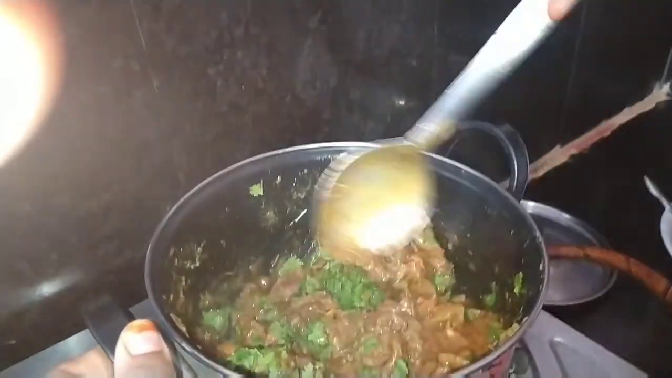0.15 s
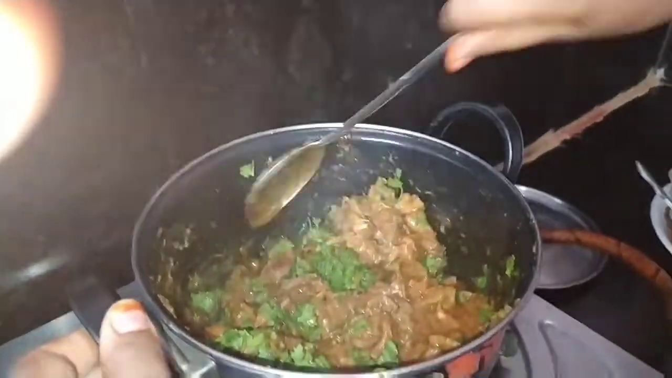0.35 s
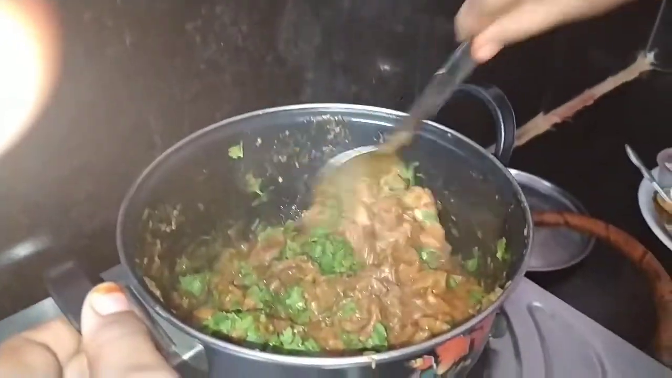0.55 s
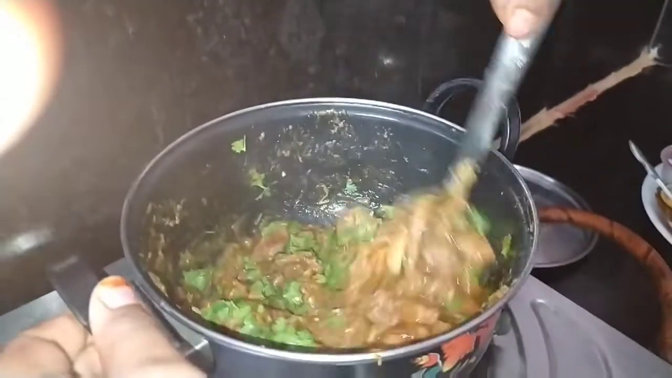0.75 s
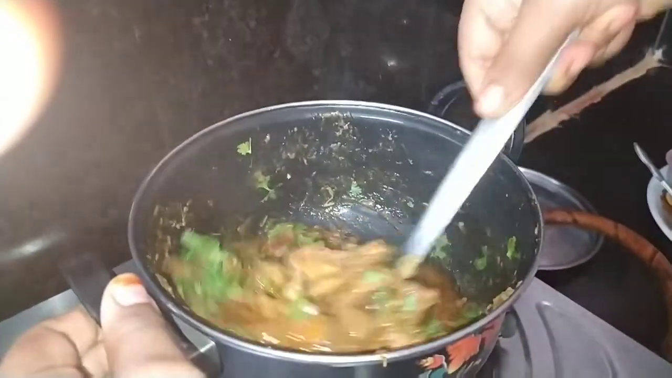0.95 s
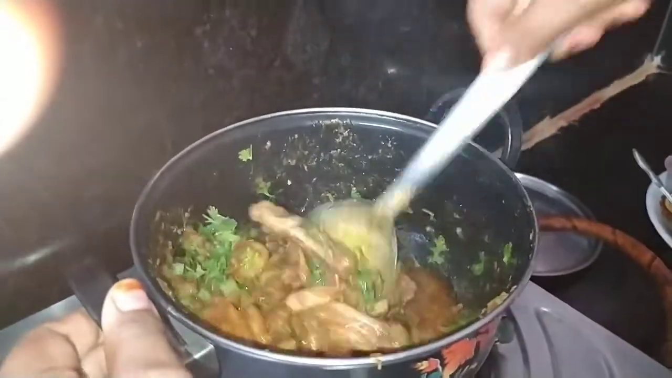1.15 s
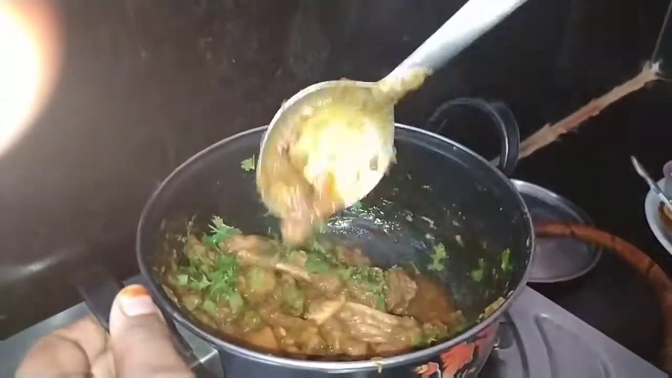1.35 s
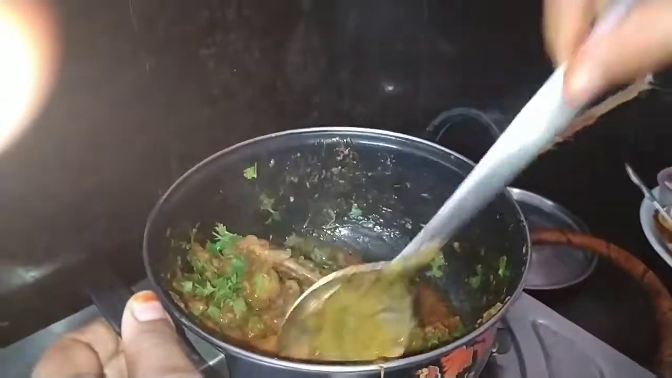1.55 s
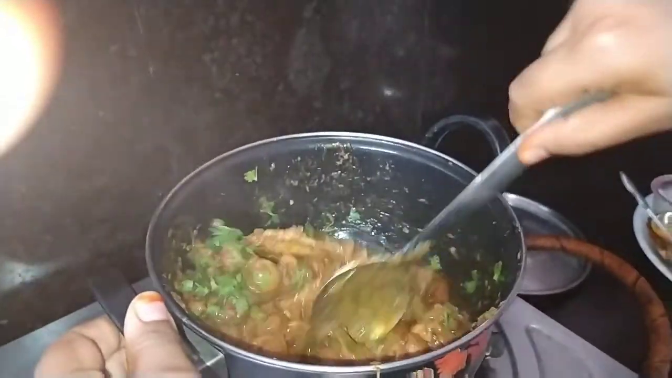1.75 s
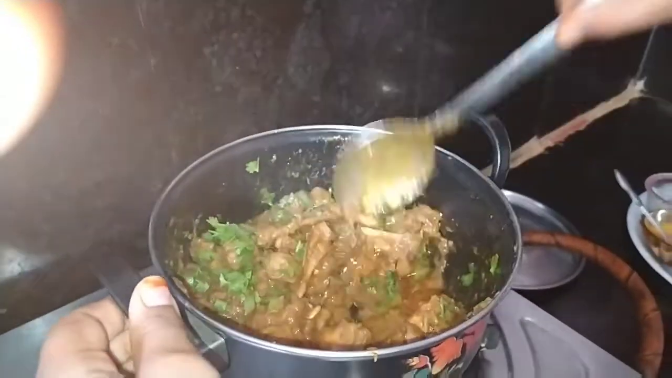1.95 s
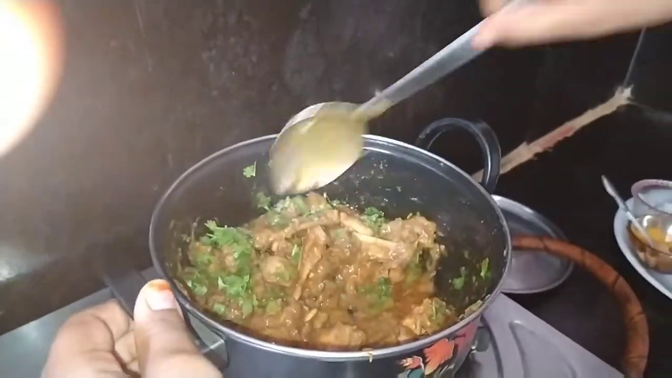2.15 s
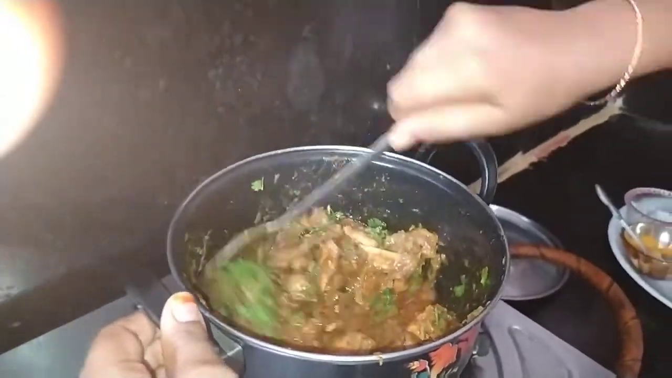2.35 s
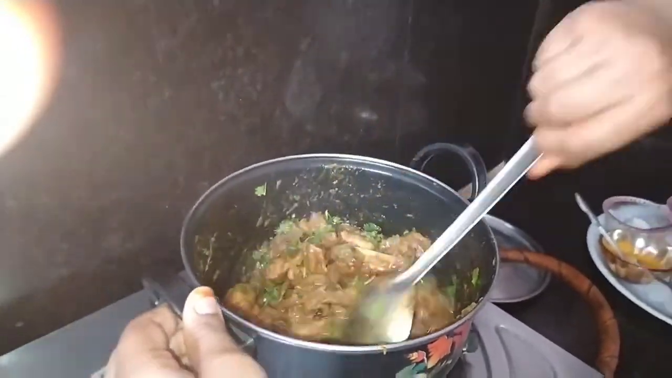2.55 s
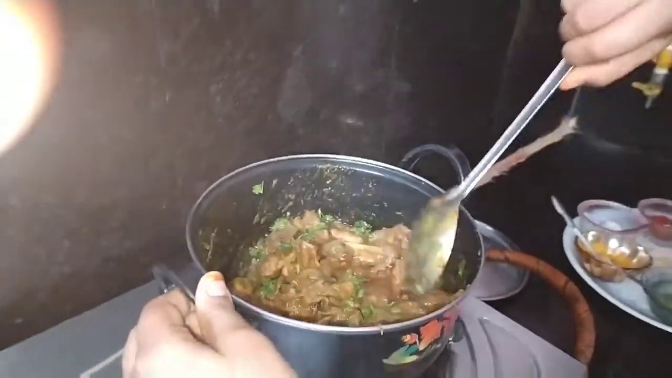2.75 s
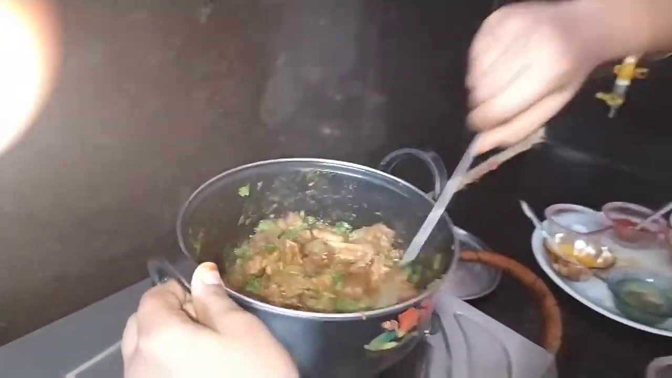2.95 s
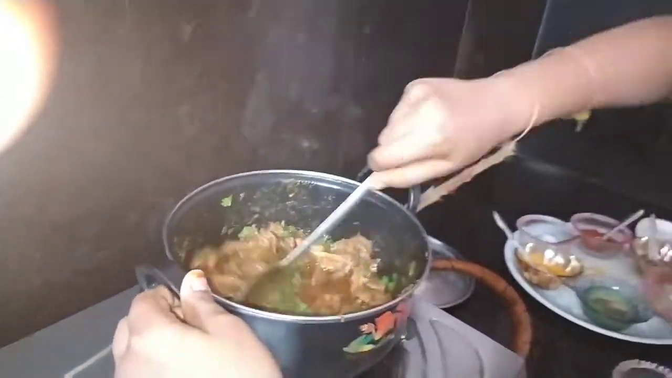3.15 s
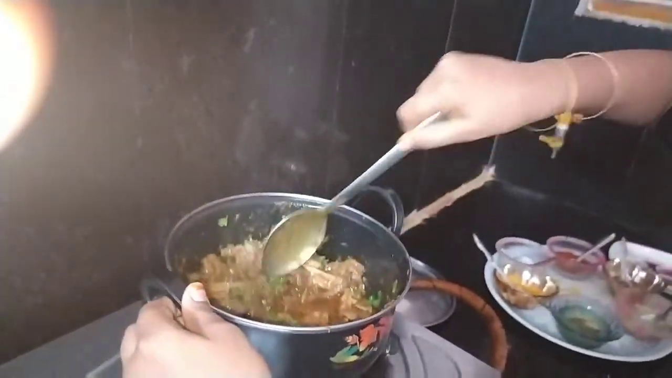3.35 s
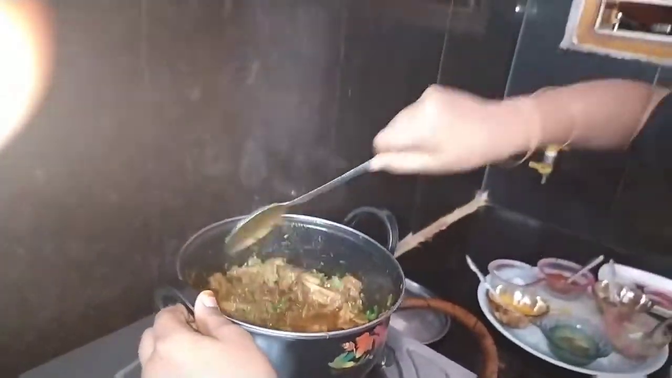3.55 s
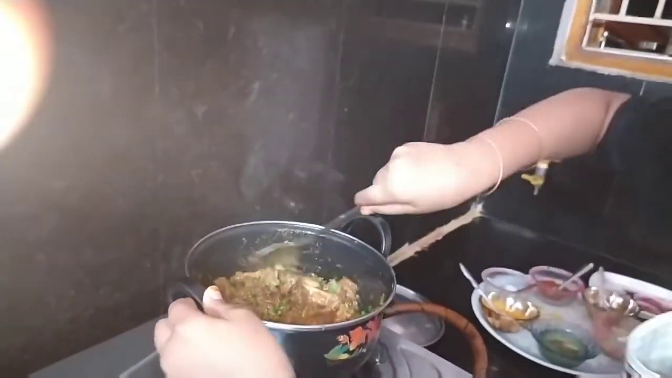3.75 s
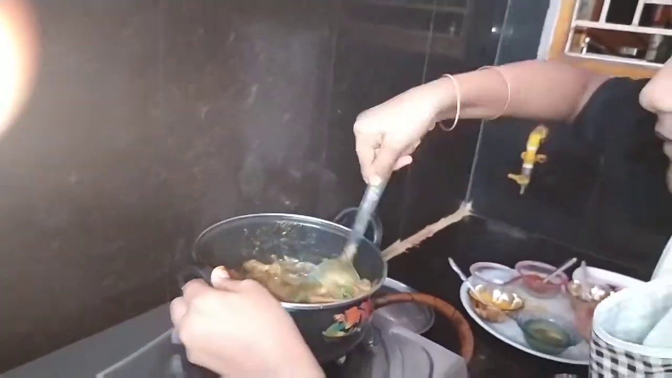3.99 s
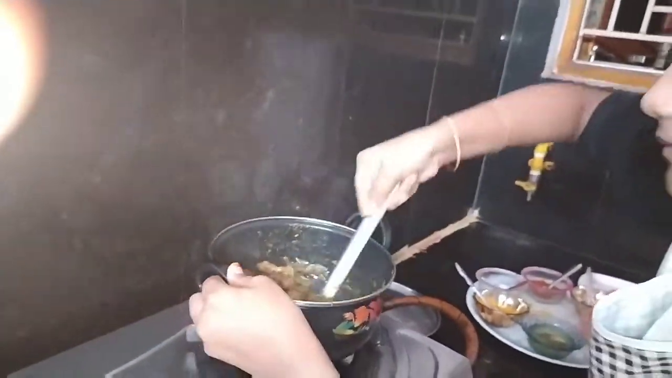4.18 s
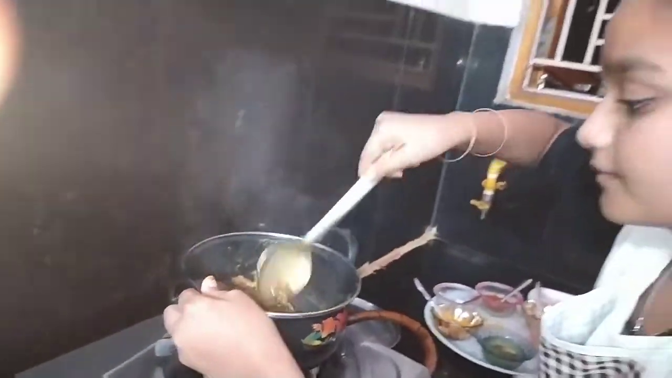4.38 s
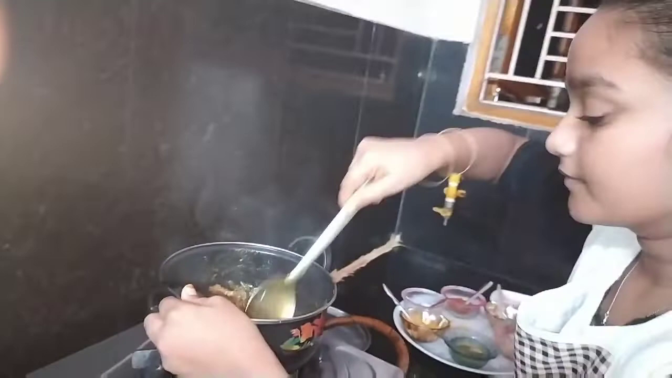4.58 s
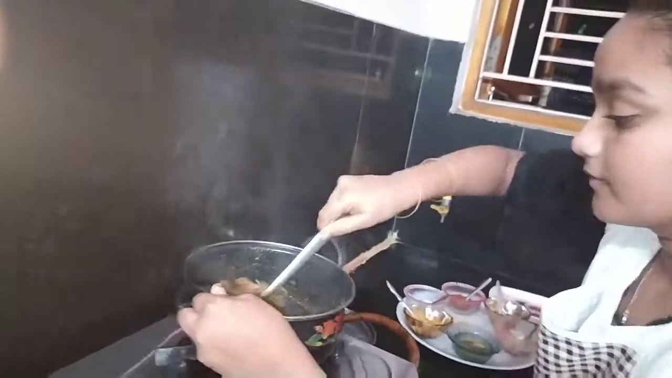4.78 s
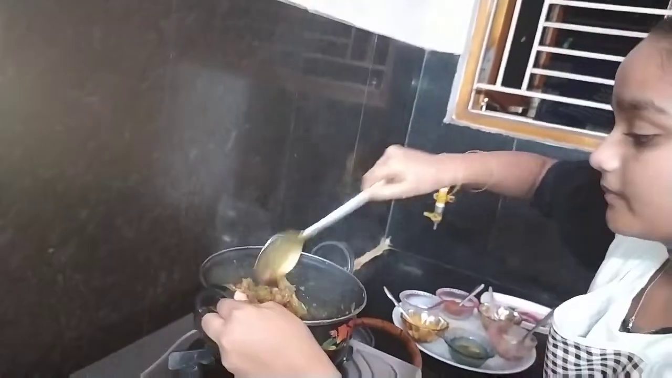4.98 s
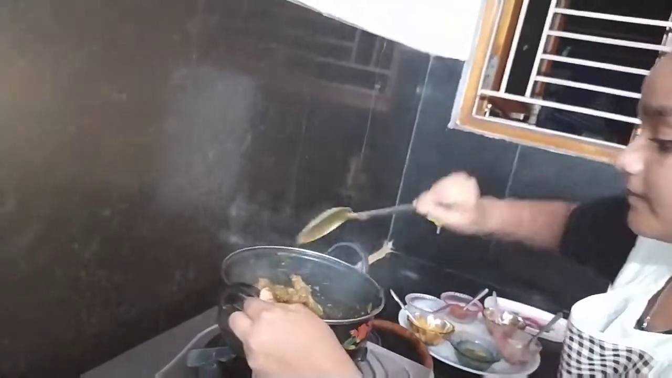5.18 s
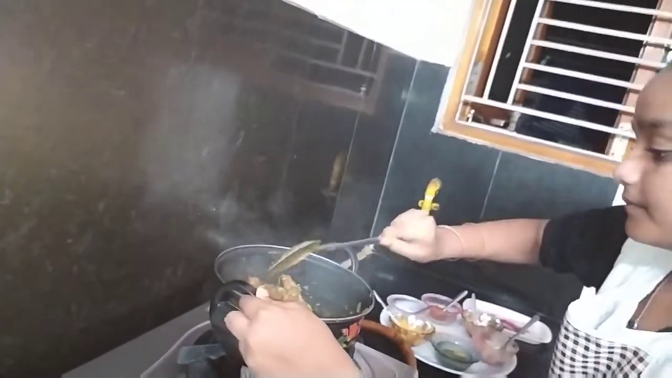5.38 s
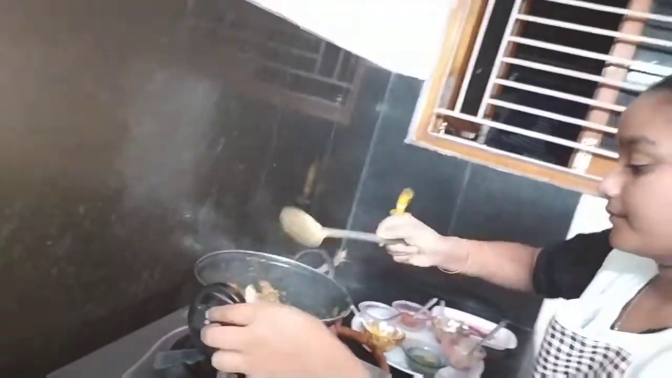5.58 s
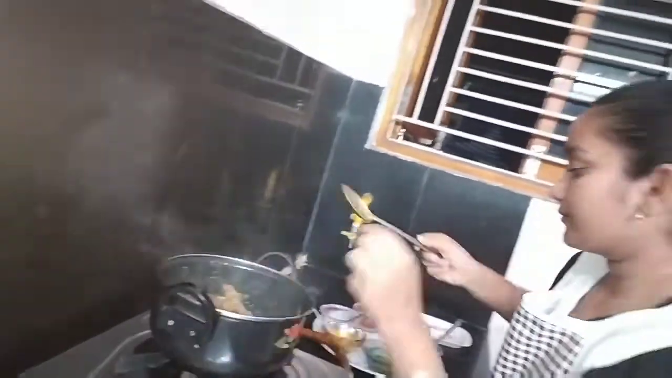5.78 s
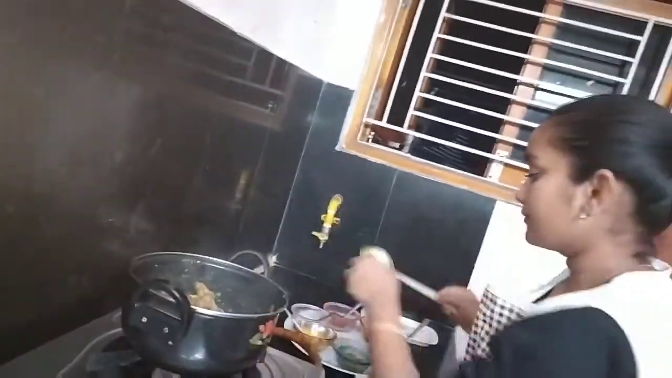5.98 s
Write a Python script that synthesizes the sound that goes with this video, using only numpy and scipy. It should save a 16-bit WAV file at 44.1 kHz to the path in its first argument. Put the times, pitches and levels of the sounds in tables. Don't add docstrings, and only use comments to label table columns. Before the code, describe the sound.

Quiet hiss and a low motor hum run throughout in a small hard-tiled kitchen, heard closely in stereo. Faint wet ticks begin at 0.2 s; from 0.4 s a steel ladle rubs the metal pan, knocking at 0.64 and more brightly at 0.85 amid gritty scrapes. A deep falling plop at 1.07 is followed by drips and small high blips until 1.35. A double clank lands at 1.8 with a low pan boom, then the hardest, brightest clank at 2.2, trailed by scraping to 2.7, strongest near 2.6. Another clank at 2.95 leads into short scrapes until 3.25, then faint drips. A knock at 3.66 starts softer continuous rubbing, with tiny fuzzy squeaks between 3.9 and 4.2. A sharp ringing clank comes at 4.74, then near quiet, a duller booming knock at 5.7 and a faint plop at 5.95.

```python
import sys
import numpy as np
from scipy import signal
from scipy.io import wavfile
from scipy.ndimage import uniform_filter1d

SR = 44100
rng = np.random.default_rng(int(sys.argv[2]) if len(sys.argv) > 2 else 0)


def elevation(decibels):
    levels = np.asarray(decibels, float)
    return 10 ** (levels / 20)


def int16_out(signal):
    q = np.round(np.clip(np.atleast_2d(signal).T, -1, 1) * 32767)
    wavfile.write(sys.argv[1], SR, q.astype(np.int16))


N = 265669


def evened(x):
    return x / np.sqrt(np.mean(x ** 2) + 1e-20)


def read(points, hz):
    point_hz, value = np.transpose(points)
    return np.interp(np.log(hz + 1), np.log(point_hz + 1), value)


def add(mix, s, sound):
    part = mix[..., round(s * SR):][..., :sound.shape[-1]]
    part += sound[..., :part.shape[-1]]


def resonate(x, hz, width_hz):
    turn = np.exp(2j * np.pi * np.cumsum(hz * np.ones(x.shape[-1])) / SR)
    r = np.exp(-np.pi * width_hz / SR)
    return 2 * (turn * signal.lfilter([1 - r], [1, -r], x / turn)).real


def resonate_twice(x, hz, width_hz):
    return resonate(resonate(x, hz, width_hz), hz, width_hz)


def sides(pan_db):
    return elevation(np.array([pan_db / 2, -pan_db / 2]))


def causal(db):
    log_gain = np.log(elevation(np.maximum(np.r_[db, db[-2:0:-1]], -100)))
    taps = np.fft.ifft(np.exp(log_gain - 1j * signal.hilbert(log_gain).imag)).real[:2048]
    return taps / np.linalg.norm(taps)


def wander(x, patchy_db):
    z = signal.stft(x, nperseg=512, noverlap=384)[2]
    patches = uniform_filter1d(rng.standard_normal(z.shape), size=2, axis=1)
    patches = uniform_filter1d(patches, size=16, axis=2)
    z = z * elevation(patchy_db * evened(patches) - 1.5)
    return signal.istft(z, nperseg=512, noverlap=384)[1][:, :N]


# hz, level_db_per_hz
STEEL_CLOUD = [(120, -31.5), (200, -5), (419, -13.5), (664, 7.5), (2860, 9), (5650, -2.5), (9840, -3.5),
               (15300, -16), (16500, -58)]


def body(modes, lo_hz, hi_hz):
    hz = np.fft.rfftfreq(8192, 1 / SR) + 1
    lifts_db = sum(db / (1 + (2 * (hz - f) / w) ** 2) for f, w, db in modes)
    band_db = -10 * np.log10((1 + (lo_hz / hz) ** 6) * (1 + (hz / hi_hz) ** 6))
    return causal(read(STEEL_CLOUD, hz) + lifts_db + band_db)


# mode_hz, width_hz, lift_db
EDGE_MODES = [(4950, 140, 1), (6900, 2700, 0.5), (8970, 300, 4.5), (9735, 510, 4.5), (12400, 2500, 3)]
WALL_MODES = [(1600, 220, 1.5), (2030, 580, 3), (2730, 560, 3.5), (3350, 230, -6), (3860, 2000, 5.5)]
BOWL_MODES = [(258.6, 73, 14), (305, 38, 15), (498, 47, 13.5), (690, 25, 4)]


def parts():
    return body(EDGE_MODES, 5830, 22000), body(WALL_MODES, 1170, 4130), body(BOWL_MODES, 159.8, 620)


# start_s, edge_peak_db, wall_db, contact_ms, room_db
KNOCK_EVENTS = [(.6425, -16, -37, 17, -6.5), (0.851, -13, -31, 4.6, -12), (1.794, -15.5, -35, 2.9, -8.5),
                (1.8255, -10.5, -27.5, 2.8, -9), (2.213, -6.5, -17, 3.2, -4.5), (2.951, -9, -21, 5.3, -6.5),
                (3.015, -22, -32, 5.3, 2), (3.1, -27, -45, 11, -8), (3.661, -19.5, -42, 4, -6.5),
                (3.673, -28, -44.5, 2.7, -7), (4.7385, -8, -23.5, 4.2, -2.5), (5.71, -32.5, -43.5, 10.2, 0),
                (5.726, -18, -33.5, 2.3, -6.5)]


def knocks(ring_db=-8.0, ring_s=0.0063):
    out, to_room = np.zeros((2, N)), np.zeros((2, N))
    edge, wall, _ = parts()
    t = np.arange(3000) / SR
    for s, edge_db, wall_db, ms, room_db in KNOCK_EVENTS:
        pan = sides(1.1 + 0.49 * edge_db)[:, None]
        contact = np.exp(-(t * 1000 / max(ms, .3)) ** 6)
        shape = np.maximum(contact, elevation(ring_db) * np.exp(-t / ring_s))
        shape *= np.minimum(t * 1000 / (.3 + 0.18 * ms), 1)
        near, far = rng.standard_normal((2, 3000))
        rough = shape * np.array([0.24 * near + 0.9 * far, near])
        click = elevation(edge_db - 6.5) * edge + elevation(wall_db + 4.5) * wall
        add(out, s, pan * signal.oaconvolve(rough, click[None], axes=1))
        add(to_room, s, pan * elevation(room_db) * np.linalg.norm(shape) * click)
    return out, to_room


def drag(start, end, db):
    land_s = 0.0031
    t = np.arange(len(db)) / SR
    return elevation(db) * np.clip(np.minimum(t, end - start - t) / land_s, 0, 1)


def drifting(start, end, db, drift_db):
    return drag(start, end, np.linspace(db, db + drift_db, round((end - start) * SR)))


# start_s, top_s, end_s, edge_db, wall_over_edge_db
PUSH_EVENTS = [(0.658, 0.695, 0.72, -33, -1), (0.713, .755, 0.79, -40, -2.5),
               (0.912, 0.967, 1.067, -40, -0.5), (1.242, 1.245, 1.29, -54.5, -6),
               (1.288, 1.29, 1.337, -53, -3), (1.57, 1.583, 1.59, -44.5, -5.5),
               (1.594, 1.688, 1.736, -49, -6), (2.33, 2.36, 2.43, -32, -5.5), (2.524, 2.538, 2.61, -44, -7),
               (3.004, 3.015, 3.02, -24.5, -23), (3.033, 3.08, 3.1, -37.5, 0.5),
               (3.098, 3.144, 3.174, -33, -3), (4.34, 4.418, 4.46, -52.5, -14)]
# start_s, end_s, edge_db, wall_over_edge_db, drift_db
SLIDE_EVENTS = [(.425, 0.525, -59, -1.5, -4.5), (0.518, 0.579, -40.5, -8.5, 2),
                (0.578, .598, -33.5, -10, -2), (.766, 0.846, -38.5, -2.5, 3), (.87, 0.922, -36.5, -21, -19),
                (1.06, 1.237, -55, -7, -10), (2.247, 2.334, -37, -31, -1.5), (2.417, 2.469, -34.5, -5, 3),
                (2.468, 2.523, -39.5, -19, -13), (2.576, 2.635, -23.5, -7.5, -3),
                (2.634, 2.7, -36.5, -12, -20), (2.96, 3.004, -37, 2, -9), (3.018, 3.05, -42, 2, -2),
                (.598, .642, -50, -8, -2), (3.165, 3.25, -44, -11, -14), (3.675, 3.856, -45, -25, -10),
                (3.864, 3.913, -42.5, -5, -1), (3.908, 3.954, -50, -4, -7), (3.958, 3.988, -39, -5, 0),
                (3.985, 4.037, -44.5, -4, -1), (4.034, 4.098, -43, -3, 4), (4.095, 4.127, -44, -2, -1),
                (4.124, 4.242, -40, -2.5, -6.5), (4.239, 4.336, -45.5, -3, -24),
                (4.543, 4.724, -48.5, -12, -6), (4.99, 5.103, -57.5, -4.5, -3), (5.985, 6.024, -60, -4, 3)]
# start_s, end_s, level_db, drift_db
SHOVE_EVENTS = [(0.429, .5, -53, -10), (0.532, .62, -54.5, 2), (0.704, 0.801, -43.5, 1.5),
                (.8, 0.899, -41, -1), (.95, 1.054, -50.5, 2.5), (1.07, 1.217, -40, -20),
                (1.834, 1.93, -40, -16), (5.72, 5.863, -41, -16), (2.555, 2.64, -47.5, -4.5),
                (2.979, 3.199, -45, 1.5), (3.979, 4.345, -48.5, -7)]


def pressure():
    rise_db, let_go_db = 12.5, 14
    out, contacts = np.zeros((3, 2, N)), []
    for start, top, end, db, wall_db in PUSH_EVENTS:
        t = np.arange(start, end, 1 / SR)
        course_db = np.interp(t, [start, top, end], [db - rise_db, db, db - let_go_db])
        contacts.append((start, drag(start, end, course_db), wall_db))
    for start, end, db, wall_db, drift_db in SLIDE_EVENTS:
        contacts.append((start, drifting(start, end, db, drift_db), wall_db))
    for start, press, wall_db in contacts:
        shares = elevation([0, wall_db + 2.5, -18 + 0.73 * wall_db])
        pan = sides(-7 - 0.19 * wall_db)
        add(out, start, shares[:, None, None] * pan[:, None] * press)
    for start, end, db, drift_db in SHOVE_EVENTS:
        add(out[2], start, drifting(start, end, db, drift_db) * sides(-1.8)[:, None])
    return out


def scrape(grains_per_s=5000., spread_db=2.6, judder_db=0.87):
    sizes = elevation(spread_db * np.minimum(rng.exponential(1, N), 5))
    sizes *= rng.random(N) < grains_per_s / SR
    sizes *= elevation(judder_db * evened(uniform_filter1d(rng.standard_normal(N), size=180)))
    near, far = rng.choice([-1., 1.], (2, N))
    grit = evened(sizes * np.array([0.46 * near + 0.58 * far, near])) * elevation(-0.92)
    rubbed = np.zeros((2, N))
    for press, part in zip(pressure(), parts()):
        rubbed += signal.oaconvolve(grit * press, part[None], axes=1)[:, :N]
    return wander(rubbed, 2.6)


# start_s, pitch_hz, level_db, t60_s
RING_EVENTS = [(.851, 1560, -14.5, 0.028), (.851, 1310, -18, 0.027), (.699, 1190, -29.5, .04),
               (1.793, 1300, -40, .04), (1.825, 1300, -23, 0.065), (1.826, 970, -22, 0.057),
               (3.662, 6320, -30.5, 0.065), (5.716, 673, -34, 0.23), (2.2128, 6640, -10, 0.04),
               (2.2128, 7280, -13, 0.045), (2.2128, 4300, -16, 0.025), (2.217, 7000, -28, .2),
               (2.215, 3300, -25, .1), (2.215, 2100, -24, .1), (5.74, 800, -42, .25),
               (5.718, 2200, -39, .15), (2.953, 1300, -27, .08), (2.952, 4000, -25, .08),
               (2.213, 2800, -18, 0.078), (2.953, 2060, -23.5, 0.12), (4.738, 9020, -25, 0.16),
               (4.739, 6820, -20.5, 0.071), (4.738, 2500, -16, 0.07), (4.739, 2220, -31, 0.19),
               (4.74, 1900, -31, 0.3), (4.74, 2830, -30.5, 0.2), (4.74, 3970, -34.5, .25),
               (4.742, 680, -30, .25), (4.74, 4400, -35, 0.13), (4.738, 1600, -21, .06),
               (4.745, 1640, -35, 0.3), (5.715, 1270, -37, 0.22), (5.713, 1940, -33, .15)]
# start_s, end_s, pitch_hz, level_db
SINGING_EVENTS = [(.522, .598, 1630, -45.5), (.52, 0.6, 3150, -45), (.522, .596, 5170, -51),
                  (.521, .55, 8410, -45), (.686, .706, 4800, -41.5), (.661, .7, 1750, -46),
                  (3.1, 3.114, 9700, -36), (3.1, 3.107, 7100, -37.5), (4.055, 4.075, 4320, -51),
                  (3.99, 4.045, 2050, -52.5), (4.2, 4.28, 710, -53), (3.018, 3.045, 6850, -44),
                  (0.533, 0.575, 10200, -41.5), (.815, 0.847, 1310, -45), (1.575, 1.592, 10140, -48),
                  (2.229, 2.342, 6600, -42), (2.235, 2.275, 3100, -43), (2.246, 2.3, 2300, -47),
                  (2.3, 2.375, 2850, -47), (2.372, 2.425, 2650, -42), (2.354, 2.364, 8700, -36),
                  (2.354, 2.364, 10300, -39), (2.422, 2.455, 10200, -41), (2.455, 2.468, 9000, -36),
                  (2.42, 2.478, 2840, -42), (4.053, 4.088, 5800, -48), (4.119, 4.165, 5850, -49),
                  (2.35, 2.39, 4840, -42), (2.419, 2.47, 4790, -39), (.575, 0.594, 10050, -38),
                  (0.829, 0.84, 8900, -45), (2.582, 2.63, 6950, -35.5), (3.006, 3.026, 6900, -33.5),
                  (4.55, 4.64, 4990, -60), (4.63, 4.72, 5120, -63), (4.57, 4.65, 8850, -48.5),
                  (4.63, 4.735, 9000, -54), (4.56, 4.63, 9600, -57), (4.64, 4.726, 10100, -56),
                  (4.545, 4.62, 11000, -58), (4.56, 4.72, 12850, -63), (.79, .81, 4700, -39),
                  (.805, .842, 3600, -43.5), (2.585, 2.63, 8650, -35), (2.59, 2.63, 9730, -36),
                  (2.225, 2.3, 7300, -41.5), (5.001, 5.055, 9830, -59), (5.055, 5.08, 2090, -57.5)]


def clear_modes(alike=.6):
    out, mix = np.zeros((2, N)), np.array([[alike, .8], [1, 0]])
    t = np.arange(9000) / SR
    for s, hz, db, t60 in RING_EVENTS:
        shake = mix @ rng.standard_normal((2, 9000))
        ring = evened(resonate_twice(shake, hz, 14 / t60 + .02 * hz))
        pair = np.sin(2 * np.pi * hz * .985 * t) + 0.74 * np.sin(2 * np.pi * hz * 1.03 * t)
        decay = elevation(db - 3.5 - 60 * t / t60) * np.minimum(t / 0.0016, 1)
        add(out, s, decay * (0.57 * ring + 0.89 * pair))
    for start, end, hz, db in SINGING_EVENTS:
        n = round((end - start) * SR)
        rub = mix @ rng.standard_normal((2, 9000))[:, :n]
        spot_hz = hz * (1 + .015 * evened(uniform_filter1d(rub[1], size=900)))
        ring = evened(resonate_twice(rub, spot_hz, 150 + .025 * hz))
        steady = ring / (.6 + .5 * uniform_filter1d(abs(ring), size=200))
        add(out, start, elevation(db) * evened(steady) * signal.windows.tukey(n, .3))
    return out * sides(-10.0)[:, None]


# start_s, level_db, low_mode_hz, upper_mode_db, t60_s
THUD_EVENTS = [(.45, -40, 229, -21, 0.28), (0.698, -40.5, 313, 9.5, 0.31), (0.861, -46, 318, 14, 0.28),
               (1.078, -35, 258, 2, 0.4), (1.829, -28, 270, 1, 0.33), (2.216, -31, 195, 9, .11),
               (2.953, -39, 255, 5.5, 0.35), (3.663, -41.5, 261, 5.5, 0.51), (4.16, -41, 309, 0, 0.2),
               (4.742, -48, 283, 14, 0.48), (5.715, -28, 258, 2, 0.5), (5.81, -40, 275, -12, .5),
               (5.95, -47, 450, -8, 0.3)]


def thuds(kick=0.74):
    out, t = np.zeros((2, N)), np.arange(SR // 2) / SR
    upper_hz, upper_width_hz = 623, 520
    for s, db, low_hz, up_db, t60 in THUD_EVENTS:
        shakes = rng.standard_normal((2, len(t))) * elevation(-60 * t / t60)
        swell = shakes[0] * np.minimum(0.63 + t / 0.023, 1)
        low = resonate(swell, low_hz, 38)
        low = low + .8 * resonate(swell, 1.258 * low_hz, 43)
        low = low + .9 * resonate(swell, 1.55 * low_hz, 60)
        low = resonate(low, 1.2 * low_hz, 300)
        free = np.sin(2 * np.pi * low_hz * t) + .35 * np.sin(2 * np.pi * 1.17 * low_hz * t)
        free = free * elevation(-60 * t / t60) * np.minimum(t / .008, 1)
        low = .75 * low / abs(low).max() + .5 * free
        kicked = shakes + kick * np.sin(np.pi * np.minimum(t / 0.00093, 1))
        upper = resonate_twice(kicked * elevation(-12 * t / t60), upper_hz, upper_width_hz)
        upper = resonate(upper, upper_hz, upper_width_hz)
        add(out, s, elevation(db) * (low / abs(low).max() + elevation(up_db) * upper / abs(upper).max()))
    return out


# push_s, leak_s, level_db
PORT_JOLT = (0.0076, 0.06, -13.5)


def jolt():
    push_s, leak_s, db = PORT_JOLT
    out, t = np.zeros((2, N)), np.arange(SR // 3) / SR
    push = (t / push_s) ** 2 * np.exp(2 - 2 * t / push_s)
    leaked = signal.lfilter([1, -1], [1, -np.exp(-1 / (leak_s * SR))], push)
    add(out, 2.216, -elevation([[db - 21], [db - 2.5]]) * leaked)
    return out


def pop(hz, noise, edge):
    burst = noise * np.exp(-np.arange(500) / SR / 0.0018)
    snap = np.convolve(burst, edge)[:500] + 7.4 * resonate_twice(burst, hz, .2 * hz)
    return snap / abs(snap).max()


# start_s, peak_db, pitch_hz
TICK_EVENTS = [(0.2355, -29, 7770), (0.4309, -39, 2080), (0.508, -40, 4800), (0.612, -30, 9630),
               (0.686, -30, 9200), (0.6994, -27, 9360), (0.7974, -22, 8380), (1.0574, -32, 9800),
               (1.1351, -36, 10200), (1.1912, -33, 9100), (1.2116, -39, 5000), (1.2463, -32, 2860),
               (1.2945, -30, 2740), (1.303, -31, 4730), (1.2952, -29, 6230), (3.2385, -34, 5400),
               (.468, -44, 6400), (.78, -27, 9510), (.9511, -33, 9210), (4.1452, -30, 5860),
               (4.166, -29, 1500), (4.078, -31, 2000), (1.3775, -33, 8600), (1.615, -30.5, 9400),
               (1.634, -32.5, 4050), (1.6808, -25, 9500), (1.8946, -20, 8000), (1.9889, -32, 9630),
               (2.355, -30, 4870), (2.668, -26, 9330), (3.2388, -26.5, 8800), (3.5755, -32.5, 9600),
               (3.8127, -37, 9700), (3.8457, -35, 9800), (3.9604, -28, 9850), (4.0267, -28, 9800),
               (4.126, -28, 5960), (4.542, -33, 10900)]
MORE_TICK_EVENTS = [(.1799, -45, 9200), (.2687, -44, 8410), (.3385, -43, 8910), (1.0851, -41, 8270),
                    (1.0914, -41, 9920), (1.1116, -44, 9820), (1.1238, -40, 9260), (1.1379, -39, 4500),
                    (1.1454, -43, 9240), (1.1595, -39, 9000), (1.2514, -46, 9790), (1.2768, -40, 7610),
                    (1.3254, -44, 10000), (1.3414, -40, 9960), (1.35, -39, 2500), (1.4606, -40, 8290),
                    (1.5647, -45, 8700), (1.665, -29, 8360), (1.7561, -42, 8820), (2.1638, -45, 8480),
                    (3.2696, -45, 8910), (3.2834, -42, 7940), (3.2974, -45, 12500), (3.3194, -48, 9002),
                    (3.3748, -42, 10500), (3.387, -42.5, 9600), (3.4207, -43, 9190), (3.4334, -48, 12500),
                    (3.4484, -50, 10100), (3.562, -49, 10500), (3.5915, -43, 8500), (3.7388, -40, 12500),
                    (3.7824, -45, 8840), (3.8564, -39, 13000), (4.3227, -43, 6700), (4.3631, -47, 2800),
                    (5.0035, -48, 9780), (5.426, -42, 8560), (5.655, -54, 11000), (2.94, -44, 2000),
                    (1.912, -38, 7500)]


def ticks():
    out, edge = np.zeros(N), parts()[0]
    for events, trim_db in ((TICK_EVENTS, -4.5), (MORE_TICK_EVENTS, -2.5)):
        for s, db, hz in events:
            add(out, s, elevation(db + trim_db) * pop(hz, rng.standard_normal(500), edge))
    return out * sides(-10.0)[:, None]


# start_s, end_s, slip_rate_hz, level_db
SQUEAK_EVENTS = [
    (3.865, 3.902, 1468, -45.5),
    (3.96, 4.01, 1465, -48),
    (4.07, 4.096, 1950, -48),
    (4.129, 4.189, 1550, -45.5),
]


def squeaks(jitter=0.067):
    out = np.zeros(N)
    for start, end, hz, db in SQUEAK_EVENTS:
        n = round((end - start) * SR)
        slip_hz = hz * (1 + jitter * evened(uniform_filter1d(rng.standard_normal(n), 30)))
        phase = 2 * np.pi * np.cumsum(slip_hz) / SR
        tone = np.cos(phase) + 0.99 * np.cos(2 * phase) + 0.31 * np.cos(3 * phase)
        add(out, start, elevation(db) * tone * signal.windows.tukey(n, .3))
    return out * sides(-6.5)[:, None]


# start_s, first_hz, last_hz, level_db, t60_s
PLOP_EVENTS = [
    (1.073, 800, 258, -31, .45),
    (1.245, 2950, 2750, -41, .05),
    (1.291, 2800, 2600, -38, .06),
    (1.348, 2800, 2700, -47, .04),
    (5.95, 600, 470, -43, .12),
    (4.158, 340, 300, -42, .25),
    (2.23, 330, 300, -44, .5),
    (1.83, 420, 330, -36, .3),
]


def plops():
    glide_s = .014
    out, t = np.zeros((2, N)), np.arange(SR // 3) / SR
    for s, first_hz, last_hz, db, t60 in PLOP_EVENTS:
        turns = np.cumsum(last_hz + (first_hz - last_hz) * np.exp(-t / glide_s)) / SR
        envelope = elevation(db - 60 * t / t60) * np.minimum(t / .002, 1)
        add(out, s, envelope * np.sin(2 * np.pi * turns) * np.ones((2, 1)))
    return out


# hz, t60_s
KITCHEN_DECAY = [(250, 0.67), (1000, 0.57), (3000, 0.44), (8000, 0.4), (15000, 0.42)]


def kitchen(x):
    taps = np.zeros((2, SR))
    at = np.arange(200, SR - 20, 20) + rng.integers(0, 20, (2, (SR - 201) // 20))
    np.put_along_axis(taps, at, rng.choice([-1., 1.], at.shape), 1)
    hz, t, z = signal.stft(taps, SR, nperseg=256)
    decay = elevation(-60 * t / read(KITCHEN_DECAY, hz)[:, None])
    tail = signal.istft(z * decay, SR, nperseg=256)[1]
    return signal.fftconvolve(x, tail / np.linalg.norm(tail[0]), axes=1)[:, :N]


# hz, left_over_right_db
PORT_TILT = [(200, 2.5), (700, 6), (1300, 1), (4400, 4.5), (8500, -4), (12000, 4.5), (16000, 3)]


def ports(x):
    tilt_db = read(PORT_TILT, np.fft.rfftfreq(8192, 1 / SR))
    taps = np.array([causal(tilt_db / 2), causal(-tilt_db / 2)])
    taps[0] = np.roll(taps[0], 9)
    return signal.oaconvolve(x, taps, axes=1)[:, :N]


# hz, level_db_per_hz
AIR_COLOUR = [(12, -52), (20, -7), (75, -16.5), (108, -8), (131, -19), (169, -5), (218, -24.5), (281, -7.5),
              (616, -21), (794, -18.5), (1240, -22.5), (1390, -21), (4790, -34.5), (8410, -33),
              (15000, -43), (16300, -63)]
# hz, likeness
AIR_LIKENESS = [(60, 0.11), (130, 0.8), (290, 0.86), (640, 0.83), (1410, -0.29), (3100, 0.26),
                (6820, -0.27), (15000, 0.31)]
# hz, left_over_right_db
AIR_TILT = [(60, -6), (130, -2.5), (290, 1.5), (640, 2), (1410, -3.5), (3100, -4), (6820, -7),
            (15000, -6.5)]
# pitch_hz, width_hz, level_db
MOTOR_HUM = [(104.5, 14, -66), (283, 7.6, -62)]


def air():
    frames, hz = N // 256 + 5, np.fft.rfftfreq(1024, 1 / SR)
    a, b, c, d, patches = rng.standard_normal((frames, 513, 5)).T
    patches = evened(uniform_filter1d(uniform_filter1d(patches, 14, 0), 14, 1))
    same = np.clip(read(AIR_LIKENESS, hz), -1, 1)[:, None]
    left = a + 1j * b
    z = np.array([left, same * left + np.sqrt(1 - same ** 2) * (c + 1j * d)])
    colour_db = read(AIR_COLOUR, hz) + 5 / (1 + ((hz - 9700) / 900) ** 2)
    z *= elevation(colour_db[:, None] + 2.12 * patches) * sides(read(AIR_TILT, hz))[:, :, None]
    hiss = evened(signal.istft(z, nperseg=1024, noverlap=768)[1][:, :N])
    hum = elevation(-62) * np.sin(2 * np.pi * MOTOR_HUM[0][0] * np.arange(N) / SR)
    for f, w, db in MOTOR_HUM:
        hum = hum + elevation(db) * evened(resonate_twice(rng.standard_normal(N), f, w))
    return elevation(-55 + 0.38) * hiss + hum


def scene():
    blows, to_room = knocks()
    small = ticks() + scrape() + squeaks()
    clear = clear_modes()
    booms = thuds() + plops()
    sent = to_room + elevation(-10) * small + elevation(-14.0) * clear + elevation(-10.5) * booms
    wet = wander(kitchen(sent), 3.44)
    return ports(blows + small + clear + wet) + booms + air() + jolt()


def band_limit(x):
    return signal.sosfilt(signal.butter(12, 16830, fs=SR, output="sos"), x)


def record(dry):
    lowpass = signal.firwin(255, 16800, fs=SR)
    limited = signal.oaconvolve(np.clip(dry, -1, 1), lowpass[None], "same")
    return band_limit(limited)


dry = scene()
out = record(dry)
int16_out(out)
```